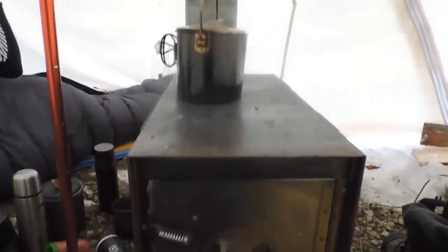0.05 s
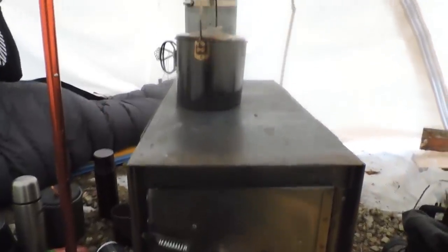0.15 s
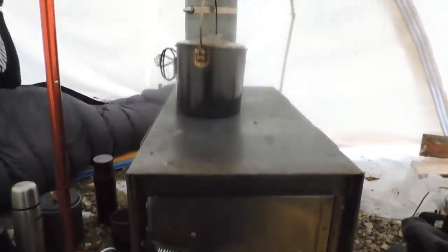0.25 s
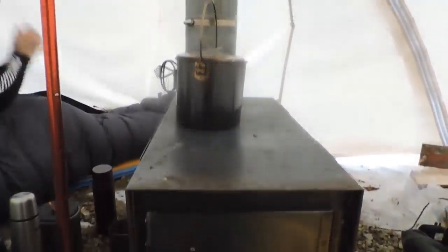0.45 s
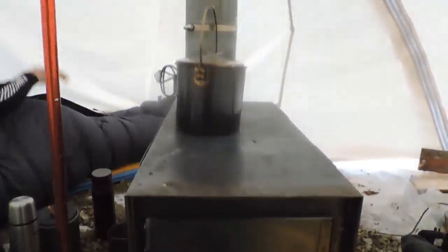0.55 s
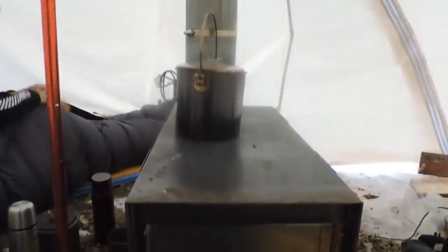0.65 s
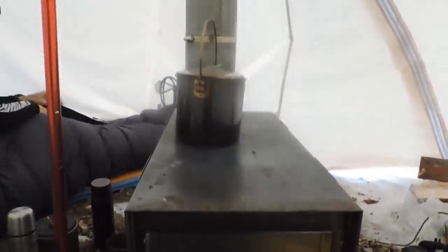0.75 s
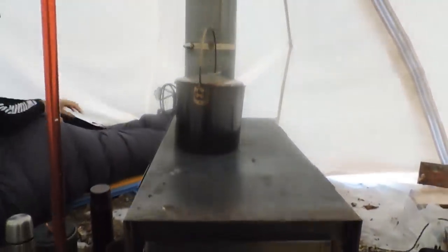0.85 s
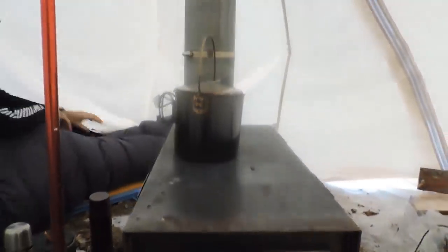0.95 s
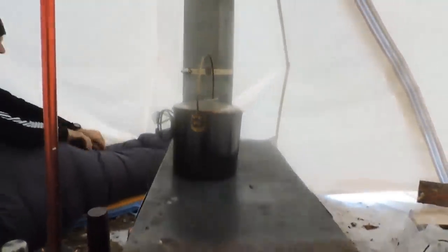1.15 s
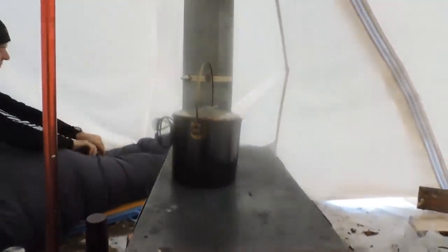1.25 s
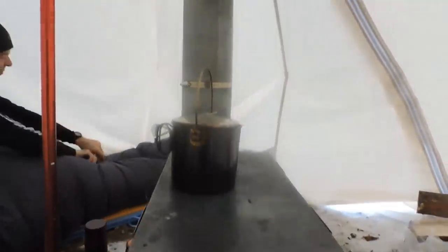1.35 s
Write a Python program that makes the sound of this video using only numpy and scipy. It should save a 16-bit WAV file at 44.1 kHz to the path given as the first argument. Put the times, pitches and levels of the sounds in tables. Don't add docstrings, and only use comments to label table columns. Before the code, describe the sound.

Close to a metal wood stove in a tent, low draught rumbles and hisses thinly; a log bursts loudly with a short metallic knock, later sharper and duller cracks follow amid tiny ticks and quiet cloth pats.

```python
import sys
import numpy as np
from scipy import signal
from scipy.fft import rfft, irfft, next_fast_len
from scipy.io import wavfile
from scipy.ndimage import uniform_filter1d, map_coordinates

SR = 44100
rng = np.random.default_rng(int(sys.argv[2]) if len(sys.argv) > 2 else 0)


def waveform_to_disk(signal):
    frames = np.transpose(np.atleast_2d(signal))
    scaled = np.clip(frames, -1, 1) * 32767
    samples = np.round(scaled).astype(np.int16)
    wavfile.write(sys.argv[1], SR, samples)


def undo_db(level):
    steps = np.asarray(level, float) / 20
    return 10 ** steps


N = 61739

# start in seconds, wall ring in dB, crack in dB, first snap in dB, place in the box [index].
LOG_BURSTS = [
    (0.2353, -15.5, -21, 1.5, 0),
    (0.9098, -39, -36, 7.5, 1),
    (1.1131, -22, -22, 2, 2),
]
# frequency in Hz, T60 in seconds, level in dB for a burst at place 0, 1, 2.
WALL_MODES = [(111, 0.13, -18, -6, -18), (164.1, 0.1, -7.5, 6.5, -8), (182.4, .25, -18.5, -26, -25),
              (449.6, .1, -9, 0, -2), (522, 0.16, -22, -15, -15), (720, .27, -19, -11.5, -27),
              (787.5, 0.059, 5, 4.5, 3), (1033, 0.041, 1.5, -14, -11), (1082.4, 0.18, -18, -18, -29),
              (1197, 0.029, -4, 4, -15), (1489, 0.17, -19.5, -19, -28.5), (1712, 0.017, -1, 5, -3),
              (2386, 0.029, -3.5, -10, -15), (3163, 0.014, 1, -30, -5)]
SPIT_WALL_DB = [-17, 4.5, -14, 5.5, -19, -21, -8, -29, -28, -26, -19, -25, -20, -6]
# start in seconds, crack in dB, centre in Hz, width in octaves, wall ring in dB.
SMALL_SPITS = [
    (0.004, -53.5, 12500, 0.82, -53),
    (0.151, -55.5, 10800, 3.4, -79),
    (0.156, -55.5, 11900, 1.2, -53),
    (0.586, -56, 11100, 0.92, -60),
    (0.781, -48.5, 7800, 6, -62),
    (0.853, -58.5, 9000, 4.7, -56),
    (1.019, -60.5, 12900, 0.22, -60.5),
    (1.2, -60, 9600, 0.12, -66),
    (1.206, -61.5, 11400, 0.17, -70),
    (1.258, -55, 10800, 3, -66),
]
# frequency in Hz, T60 in seconds.
CRACK_T60_S = [(300, 0.11), (1000, 0.069), (3000, 0.069), (8000, .075), (15000, 0.053)]
# frequency in Hz, level in dB at place 0, 1, 2.
CRACK_COLOUR_DB = [(386, -19.5, -17, -23), (1150, -6, -9, -14.5), (2400, -12, -5.5, -6),
                   (3260, -17, -6.5, -5), (4330, -20.5, -3.5, -3.5), (6000, -26, -9, -7),
                   (13500, -29.5, -15, -11.5), (16300, -33, -34, -20)]
# frequency in Hz, likeness [-1 to 1].
CRACK_LIKENESS = [(300, 0.81), (700, 0.95), (1000, 0.55), (1700, 0.76), (2400, 0.27), (3500, -0.13),
                  (5000, -0.13), (8000, -0.13)]
FIBRE_SPLIT_DB = [
    [-25.5, -32.5, -48.5],
    [-52, -30.5, -37],
    [-42, -24, -28.5],
]
# start in seconds, level in dB, pitch in Hz, length in seconds.
CLOTH_PATS = [(0.516, -65, 910, 0.012), (0.578, -58, 1310, 0.017), (0.786, -44.5, 459, 0.022),
              (0.789, -43.5, 660, 0.017), (0.818, -57, 900, .01), (0.856, -50.5, 604, 0.0089),
              (0.953, -63, 900, 0.017), (1.029, -55.5, 684, 0.0094), (1.074, -55.5, 720, 0.015),
              (1.206, -52.5, 624, 0.008), (1.240, -51.5, 833, 0.013), (1.276, -57, 540, 0.011),
              (1.292, -57, 594, 0.012), (1.321, -56, 710, 0.012), (1.382, -48.5, 600, 0.0066)]
# time in seconds, level in dB.
RUSTLE_DB = [(0, -68.5), (.45, -83), (.52, -69), (.76, -78), (.79, -56.5), (.9, -59), (.98, -56),
             (1.02, -64.5), (1.17, -66), (1.22, -57), (1.4, -58)]
# frequency in Hz, density in dB per Hz.
CLOTH_SPECTRUM = [(200, -36), (500, -6.5), (1200, 0), (2500, -3.5), (4500, -11), (9000, -15.5),
                  (15000, -15)]
# time in seconds, hiss in dB, rumble in dB.
DRAUGHT_DB = [(0, -57, -43.5), (0.129, -57.5, -48.5), (.33, -59, -49.5), (0.529, -57.5, -51),
              (.7, -57.5, -51), (0.789, -56, -44.5), (.9, -53, -51.5), (1.051, -58.5, -53),
              (1.4, -54.5, -50.5)]
# frequency in Hz, density in dB per Hz.
HISS_SPECTRUM = [(150, -40), (300, -2), (1100, -2.5), (3500, -12), (9000, -20), (12000, -18),
                 (14500, -19.5), (16000, -16.5)]
# frequency in Hz, density in dB per Hz.
RUMBLE_SPECTRUM = [(12, -15), (20, -4.5), (91, -3.5), (130, -9), (189, -14), (202, -11), (221, -25.5),
                   (277, -20), (300, -45), (390, -63), (660, -120)]
# frequency in Hz, likeness [-1 to 1].
DRAUGHT_LIKENESS = [(60, 0.9), (180, 0.97), (350, 0.21), (700, 0.68), (1000, 0.00063), (1700, 0.33),
                    (4000, 0)]

SPLIT_HZ, SPLIT_T60_S = [3600, 3900, 4000], 0.012
CRACK_RISE_S, SNAP_S, SPIT_SNAP_DB, WALL_RISE_CYCLES = 0.00017, 0.00097, 1.5, 0.24
TENT_DB, TENT_T60_S = -23.5, 0.23
WHISTLE_START_S, WHISTLE_END_S, WHISTLE_DB = 0.93, 1.02, -67
WHISTLE_FROM_HZ, WHISTLE_TO_HZ = 4400, 6000
PAT_WIDTH_OCT, PAT_EDGE_DB, PAT_EDGE_HZ = 0.56, -12.5, 1980
HISS_LEFT_DB = 1
TOP_HZ, LAST_HZ, SHELF_DB = 15700, 16700, -30


def unit(x):
    return x / np.sqrt(np.mean(x ** 2) + 1e-20)


def along(points, hz):
    f, v = np.transpose(points)
    return np.interp(np.log(hz + 1), np.log(f + 1), v)


def wobble(rate_hz):
    knots = rng.standard_normal(int(N * rate_hz / SR) + 4)
    return map_coordinates(knots, [np.arange(N) * rate_hz / SR])


def filtered(x, response):
    m = next_fast_len(x.shape[-1] + 8192)
    spectrum = rfft(x, m) * response(np.fft.rfftfreq(m, 1 / SR))
    return irfft(spectrum, m)[..., :x.shape[-1]]


def ports(pair, likeness):
    def mid_side(hz):
        angle = np.arccos(np.clip(along(likeness, hz), -1, 1)) / 2
        return np.array([np.cos(angle), np.sin(angle)])
    mid, side = filtered(pair, mid_side)
    return np.array([mid + side, mid - side])


def add(out, start_s, x):
    part = out[..., round(start_s * SR):][..., :x.shape[-1]]
    part += x[..., :part.shape[-1]]


def crack(colour_db, snap_db):
    hz, t, z = signal.stft(rng.standard_normal((2, SR // 4)), SR, nperseg=128)
    fall = undo_db(-60 * t / along(CRACK_T60_S, hz)[:, None])
    z = z * fall
    band_power = (abs(z) ** 2).sum(-1) / (fall ** 2).sum(-1)
    z = z / np.sqrt(uniform_filter1d(band_power, size=2, axis=1))[..., None]
    x = signal.istft(z * undo_db(colour_db(hz))[:, None], SR, nperseg=128)[1]
    x = x / np.std(x[:, :SR // 100])
    t = np.arange(x.shape[1]) / SR
    return x * (1 - np.exp(-t / CRACK_RISE_S)) * undo_db(snap_db * np.exp(-t / SNAP_S))


def walls(levels_db):
    hz, t60_s = np.transpose(WALL_MODES)[:2, :, None]
    t = np.arange(SR // 3) / SR
    decay = undo_db(levels_db[:, None] - 60 * t / t60_s)
    rise = 1 - np.exp(-t * hz / WALL_RISE_CYCLES)
    return -(decay * np.sin(2 * np.pi * hz * t) * rise).sum(0)


def fibre_split(place):
    t = np.arange(SR // 30) / SR
    tones = np.sin(2 * np.pi * np.outer(SPLIT_HZ, t))
    return -undo_db(FIBRE_SPLIT_DB[place]) @ tones * undo_db(-60 * t / SPLIT_T60_S)


def tent(source):
    t = np.arange(SR // 3) / SR
    noise = rng.standard_normal((2, len(t)))
    tail = filtered(noise, lambda hz: 1 / (1 + (hz / 4000) ** 2)) * undo_db(-60 * t / TENT_T60_S)
    return signal.fftconvolve(source[None], tail / np.linalg.norm(tail[0]), axes=1)[:, :N]


def fire():
    cracks, rings = np.zeros((2, N)), np.zeros(N)
    place_levels_db = np.transpose(WALL_MODES)[2:]
    for start_s, ring_db, crack_db, snap_db, place in LOG_BURSTS:
        place = int(round(place))
        colour = np.array(CRACK_COLOUR_DB)[:, [0, 1 + place]]
        add(rings, start_s, undo_db(ring_db) * walls(place_levels_db[place]))
        add(cracks, start_s, undo_db(crack_db) * crack(lambda hz: along(colour, hz), snap_db))
        add(rings, start_s, fibre_split(place))
    for start_s, crack_db, centre_hz, width_oct, ring_db in SMALL_SPITS:
        def hump_db(hz):
            return np.maximum(-6 * (np.log2((hz + 1) / centre_hz) / width_oct) ** 2, -40)
        levels_db = SPIT_WALL_DB + rng.normal(0, 1, len(WALL_MODES))
        add(rings, start_s, undo_db(ring_db) * walls(levels_db))
        add(cracks, start_s, undo_db(crack_db) * crack(hump_db, SPIT_SNAP_DB))
    wet = tent(rings + cracks[0])
    return rings + ports(cracks + undo_db(TENT_DB) * wet, CRACK_LIKENESS)


def whistle():
    u = np.clip((np.arange(N) / SR - WHISTLE_START_S) / (WHISTLE_END_S - WHISTLE_START_S), 0, 1)
    hz = (WHISTLE_FROM_HZ + (WHISTLE_TO_HZ - WHISTLE_FROM_HZ) * u) * (1 + 0.025 * wobble(600))
    tone = np.sin(2 * np.pi * np.cumsum(hz) / SR)
    return undo_db(WHISTLE_DB + 2.6 * wobble(80.5)) * np.sin(np.pi * u) * tone


def pats():
    out, t = np.zeros((2, N)), np.arange(SR // 12) / SR
    hz = np.fft.rfftfreq(len(t), 1 / SR)

    def hump(centre_hz):
        return np.exp(-(np.log2((hz + 1) / centre_hz) / PAT_WIDTH_OCT) ** 2)

    for start_s, level_db, pitch_hz, length_s in CLOTH_PATS:
        u = t / (length_s / 4)
        z = rfft(rng.standard_normal((2, len(t))) * u * np.exp(-u))
        z = z / np.sqrt(uniform_filter1d(abs(z) ** 2, size=9, axis=1))
        colour = hump(pitch_hz) + undo_db(PAT_EDGE_DB) * hump(PAT_EDGE_HZ)
        puff = irfft(z * colour, len(t)) * np.minimum(u, 1) * (u < 12)
        rms = np.sqrt((puff ** 2).sum(1, keepdims=True) / (SR * length_s))
        add(out, start_s - 0.001, undo_db(level_db) * puff / rms)
    return ports(out, CRACK_LIKENESS)


def rush(spectrum, patchy_db):
    z = signal.stft(rng.standard_normal((2, N)), nperseg=512)[2]
    field = uniform_filter1d(rng.standard_normal(z.shape[1:]), 6, 0)
    field = uniform_filter1d(field, 6, 1)
    pair = signal.istft(z * undo_db(patchy_db * unit(field)), nperseg=512)[1][:, :N]
    coloured = filtered(pair, lambda hz: undo_db(along(spectrum, hz)))
    return unit(ports(coloured, DRAUGHT_LIKENESS))


def rustle():
    level_db = np.interp(np.arange(N) / SR, *np.transpose(RUSTLE_DB))
    return undo_db(level_db + 2 * wobble(70.35)) * rush(CLOTH_SPECTRUM, patchy_db=3.5)


def draught():
    s, *columns = np.transpose(DRAUGHT_DB)
    hiss_db, rumble_db = [np.interp(np.arange(N) / SR, s, c) for c in columns]
    tilt_db = HISS_LEFT_DB * np.array([[1], [-1]])
    hiss = undo_db(hiss_db + 0.26 * wobble(25.1) + tilt_db) * rush(HISS_SPECTRUM, patchy_db=0.2)
    rumble = undo_db(rumble_db + 0.55 * wobble(10)) * rush(RUMBLE_SPECTRUM, patchy_db=2.0)
    return hiss + rumble


def scene():
    return draught() + fire() + pats() + rustle() + whistle()


def top_cut(x):
    return signal.sosfilt(signal.butter(12, 16650, fs=SR, output="sos"), x)


def record(dry):
    mix = filtered(dry, lambda hz: np.where(hz < TOP_HZ, 1, undo_db(SHELF_DB) * (hz < LAST_HZ)))
    return top_cut(mix)


dry = scene()
out = record(dry)
waveform_to_disk(out)
```